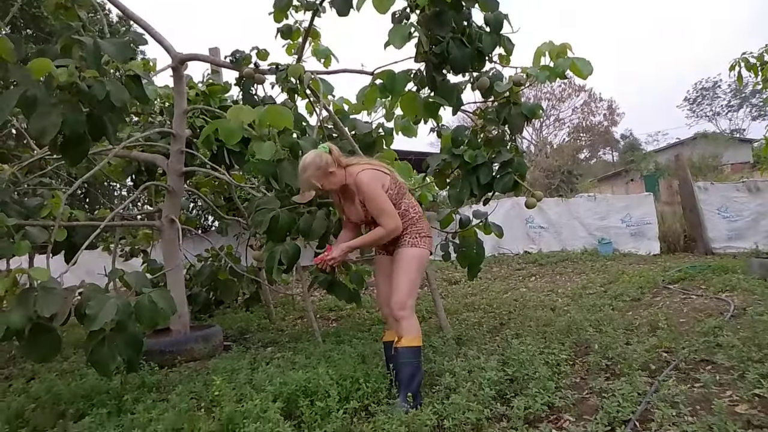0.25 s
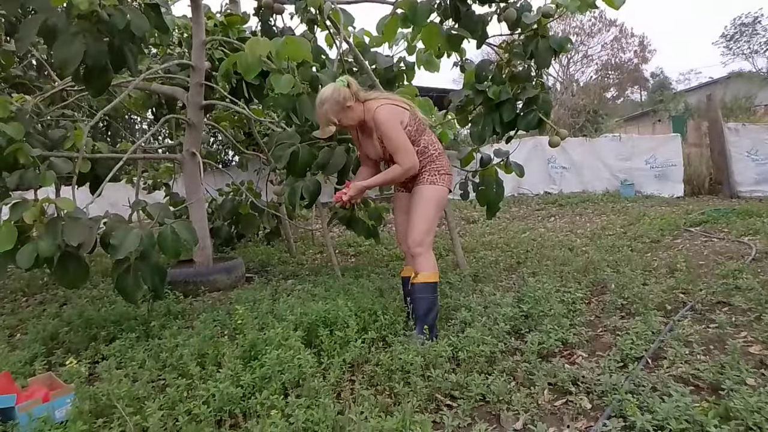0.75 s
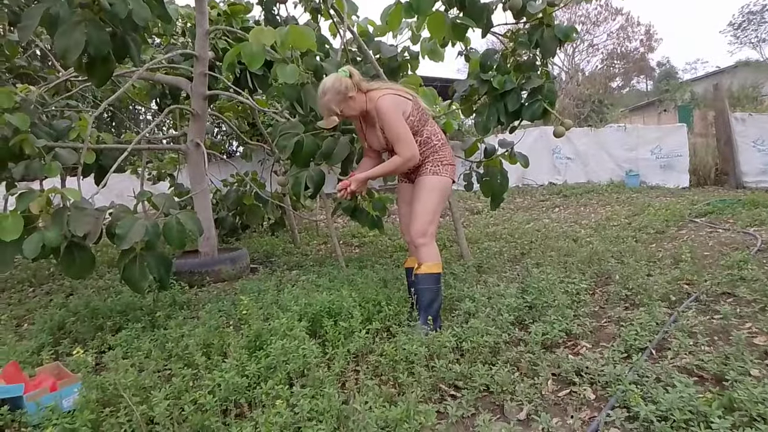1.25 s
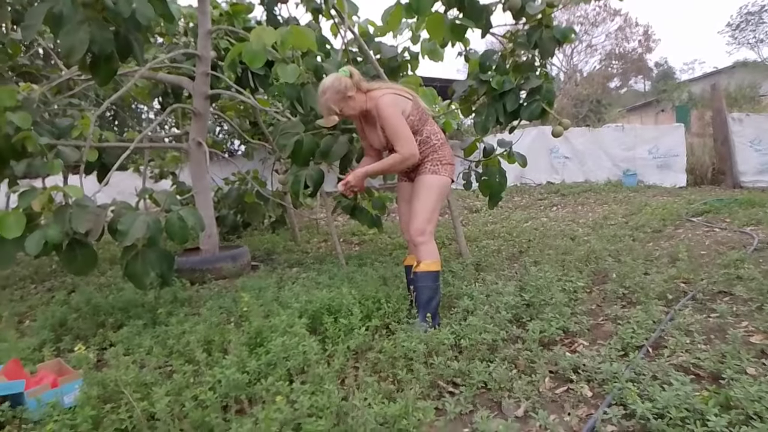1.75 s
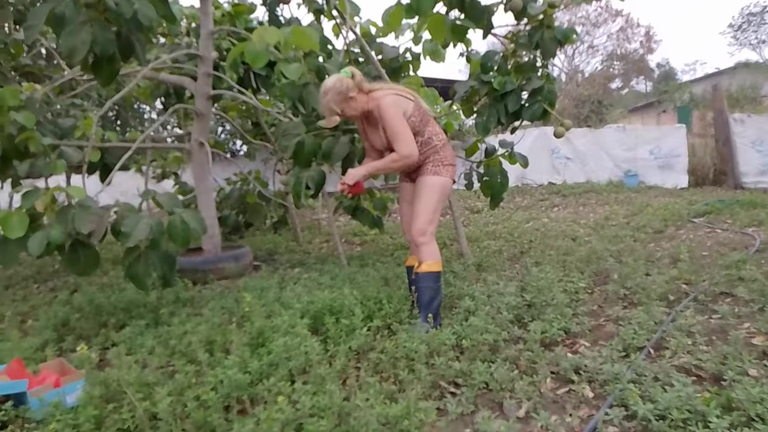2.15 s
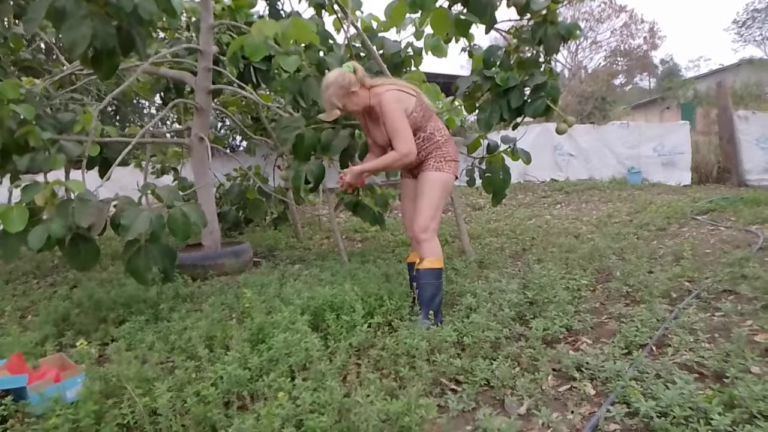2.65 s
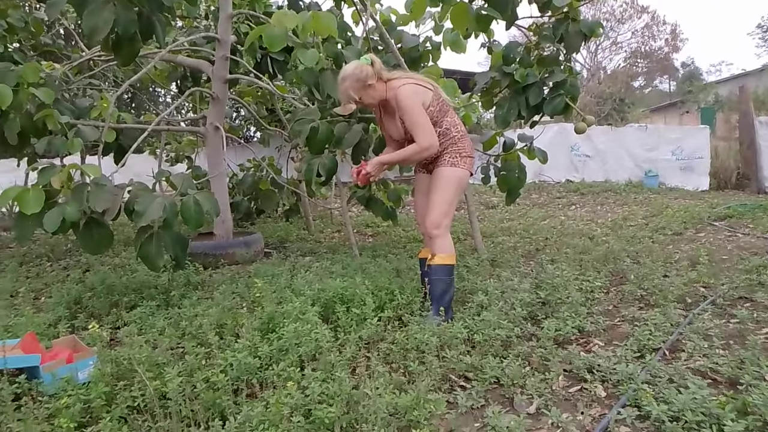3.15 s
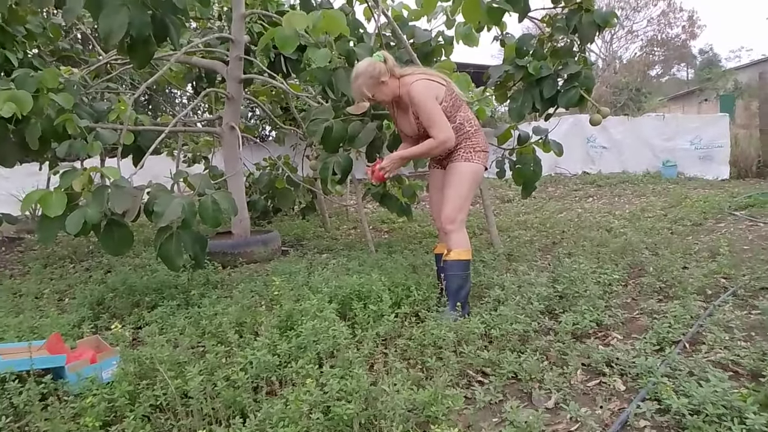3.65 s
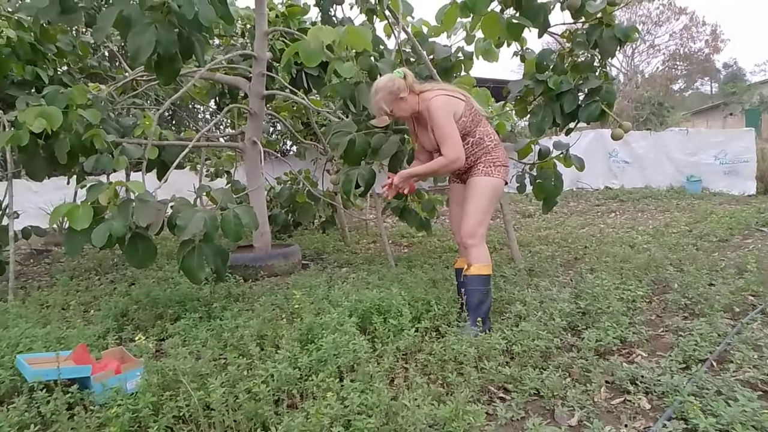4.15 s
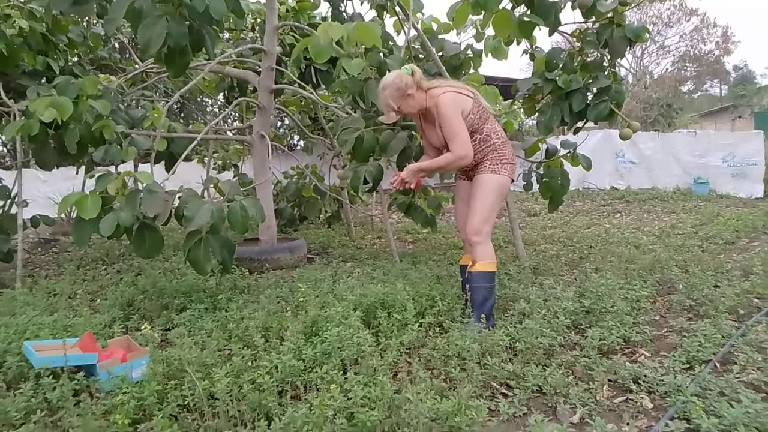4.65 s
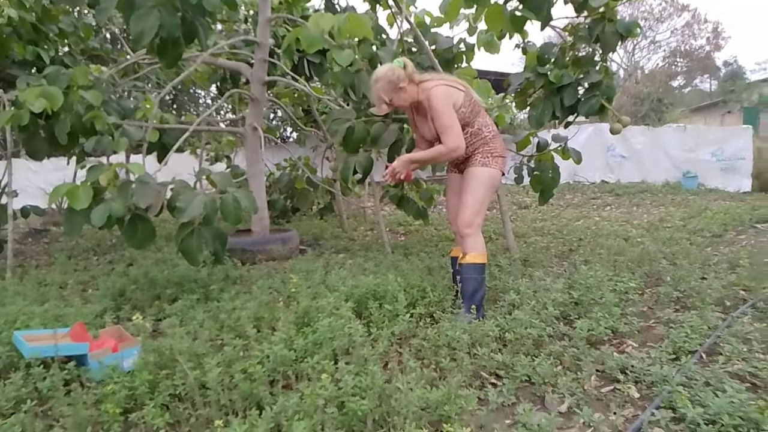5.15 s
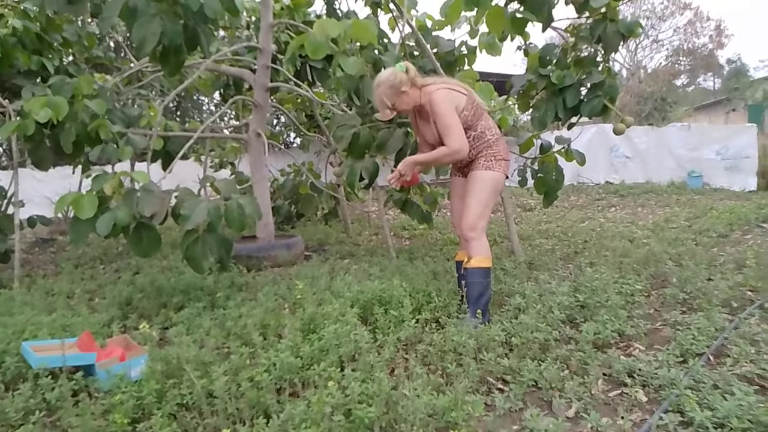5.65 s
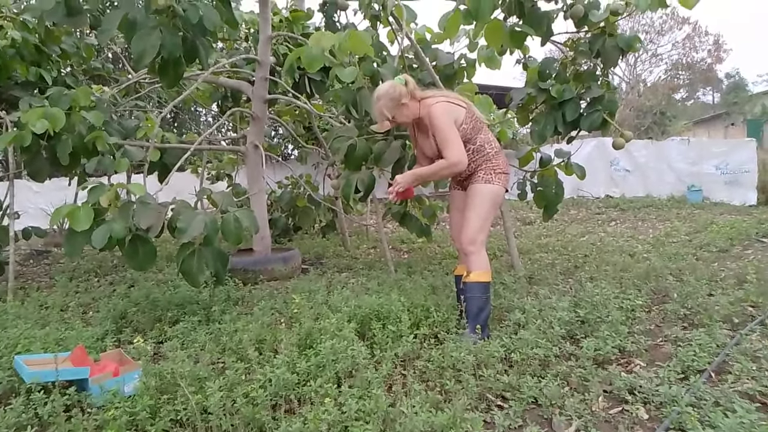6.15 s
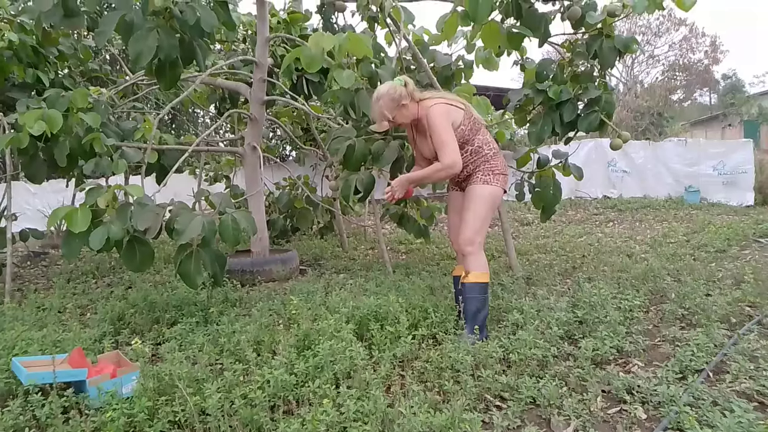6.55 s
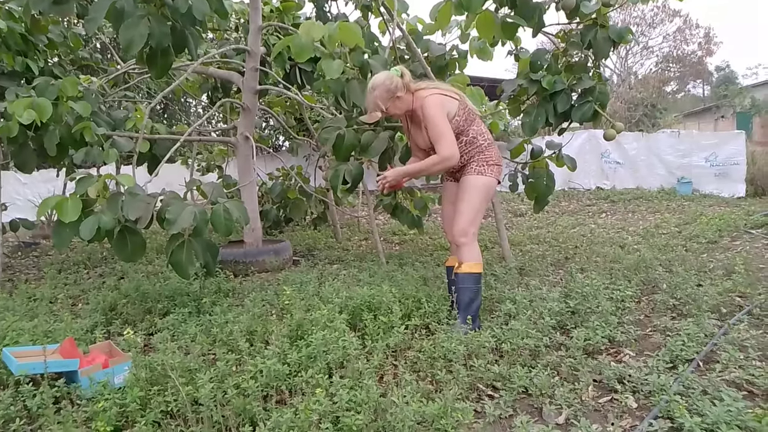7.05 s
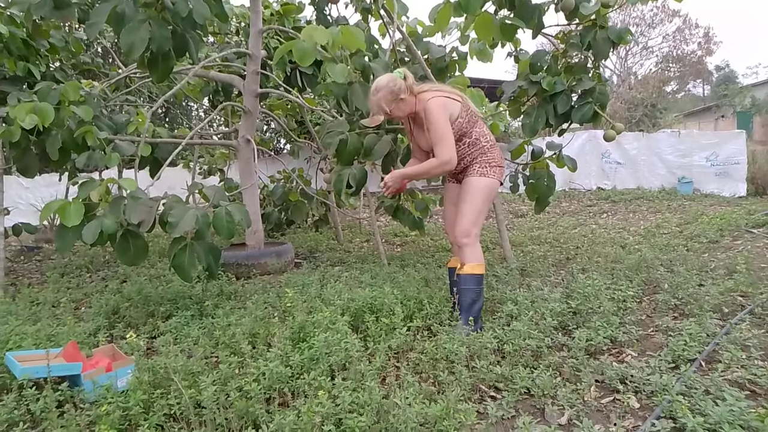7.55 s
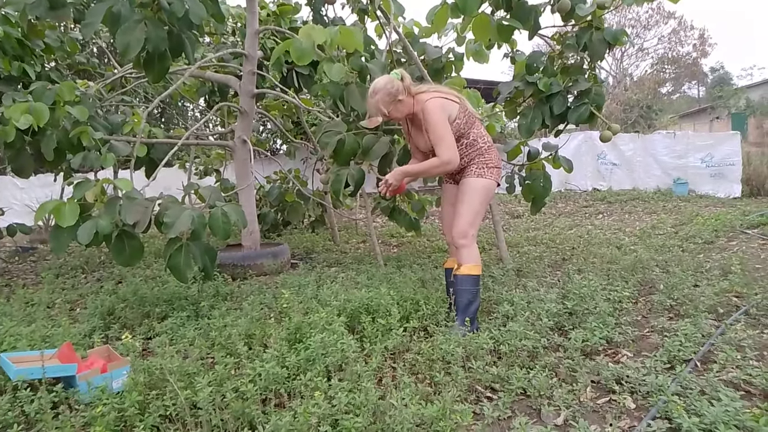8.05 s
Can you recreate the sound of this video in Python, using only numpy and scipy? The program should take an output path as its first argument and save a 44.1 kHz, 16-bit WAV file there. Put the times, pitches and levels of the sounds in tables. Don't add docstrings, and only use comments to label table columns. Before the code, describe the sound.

Four clear, piercing downward bird whistles, well spaced outdoors, with tiny far peeps and twitters between them and very faint pulsing air noise.

```python
import sys
import numpy as np
from scipy import signal
from scipy.fft import rfft, irfft, next_fast_len
from scipy.io import wavfile
from scipy.ndimage import uniform_filter1d

SR = 44100
rng = np.random.default_rng(int(sys.argv[2]) if len(sys.argv) > 2 else 0)


def makeup_ratio(level_db):
    decades = np.asarray(level_db, float) / 20
    return 10 ** decades


def digitize_waveform(pressure):
    field = np.atleast_2d(pressure).T
    bounded = np.clip(field, -1, 1)
    quanta = np.round(bounded * 32767).astype(np.int16)
    wavfile.write(sys.argv[1], SR, quanta)


N = 366030

# low_hz, high_hz
GARDEN_BANDS_HZ = [(40, 330), (400, 1900), (4900, 6100), (11500, 15000)]
# freq_hz, density_db_per_hz
AIR_SPECTRUM = [(15, -58), (25, -17), (116, -10), (188, -12), (433, -20.5), (482, -28.5), (1310, -22),
                (2240, -20.5), (2560, -0.5), (2850, -15.5), (3830, -24), (6220, -23), (15500, -70.5)]
# time_s, level_db
MOTOR_LEVEL = [(0, -15), (.7, 8.5), (1.2, 7), (1.8, 9), (2.5, 1), (3.2, -8), (4.5, -7.5), (6, -1.5),
               (7, -6.5), (8.3, -10)]
# freq_hz, level_db
MOTOR_LINES_HZ_DB = [(61.5, -1), (122, -5.5), (183, -20), (456, -24.5)]
# shut_db, lift_share, treble_share
BAND_GAINS = [
    (-73.5, 0.88, 0.16),
    (-83.5, 1.24, 0),
    (-93.5, 1.06, 0.96),
    (-100, 1.416, 0.53),
]
# start_s, open_s, closing_s, lift_db, treble_db
LEAPS_OPEN = [
    (1.058, 0.41, 0.55, 19.5, 0.5),
    (3.337, 0.43, 0.2, 16, 9),
    (6.078, 0.31, 0.24, 15, 7.5),
    (8, 0.12, 0.39, 20, -4),
]
# start_s, open_s, closing_s, lift_db, treble_db
CREEPS_OPEN = [(0, 0.02, 0.15, 7.5, -2), (.28, 0.036, 0.43, 8.5, -7), (.73, 0.62, 0.11, 4.5, 4),
               (1.205, 0.127, 0.16, 21, 9.5), (1.72, 0.13, 0.2, 8.5, -12), (1.98, .06, 0.26, 6, 0.5),
               (2.45, 0.36, .1, 3.5, 10), (2.64, 0.018, 0.34, 5.5, 16), (2.87, 0.028, 0.39, 6.5, 7),
               (3.2, 0.27, .05, 3, 12.5), (3.5, 0.074, 0.17, 19, 11.5), (3.9, .1, 0.15, 3, 1.5),
               (4.18, 0.11, 0.43, 6.5, -6), (4.9, 0.088, 0.081, -2.5, -3), (5.32, 0.044, 0.26, 6.5, -4.5),
               (5.8, 0.31, 0.11, 2, 6.5), (6.28, 0.073, 0.12, 17, 10), (6.5, 0.082, 0.18, 9, -3.5),
               (6.6, 0.15, 0.6, 8.5, 7), (7.15, 0.051, .1, -1, 10.5), (7.39, 0.12, 0.06, 2.5, 7.5),
               (7.55, 0.45, 0.33, 6.5, 2), (8.1, 0.048, 0.27, 16.5, 5)]
# start_s, peak_db
LEAF_PUFFS = [(2.1331, -72), (2.676, -54.5), (3.3415, -45), (3.3832, -53.5), (3.542, -55.5), (3.613, -51.5),
              (3.7579, -66.5), (3.8232, -50.5), (3.912, -71), (5.9035, -64), (6.4213, -61.5)]
# start_s, length_s, centre_hz, width_hz, level_db
TWITTER_PATCHES = [(0.31, 0.37, 8500, 2500, -79), (1.614, 0.19, 9900, 2430, -63.5),
                   (2.329, 0.53, 8180, 2515, -77), (2.875, 0.1, 8100, 2210, -68),
                   (3.284, 0.28, 8140, 1190, -65.5), (3.54, 0.15, 8400, 1260, -57),
                   (4.232, 0.27, 7780, 2170, -71), (4.929, 0.26, 8840, 1980, -77.5),
                   (6.601, 0.22, 7770, 1090, -67.5), (6.717, 0.22, 6230, 1210, -73),
                   (7.388, 0.061, 8200, 1400, -77.5), (7.505, 0.3, 6890, 1810, -70),
                   (8.279, 0.055, 7960, 1210, -66), (1.475, 0.28, 672, 519, -63.5),
                   (2.93, 0.16, 679, 670, -70.5), (3.658, 0.04, 1210, 1200, -58),
                   (0, 0.073, 2990, 1290, -62.5), (4.17, 0.12, 8000, 2600, -76.5)]
TWITTER_SLIDES_HZ = [1, 0, 0, 0, -0.5, 0, -1800, 900.5, 297, -600, -0.5, -300, -2, -0.5, 0, -0.5, 0, 1]
# start_s, length_s, start_hz, end_hz, level_db
HELD_PEEPS = [(0, 0.25, 4100, 3950, -78), (.27, 0.18, 4043, 3870, -67.5), (.855, 0.08, 4010, 3780, -66.5),
              (1.21, 0.19, 3910, 3680, -55.5), (1.585, .15, 4076, 3640, -62.5),
              (2.01, 0.16, 3867, 3810, -69), (2.02, 0.16, 3430, 3390, -74), (2.38, 0.18, 3870, 3320, -76.5),
              (2.92, 0.058, 4410, 4510, -72), (3.43, 0.14, 4060, 4090, -52), (3.46, 0.13, 3800, 3290, -54),
              (4.225, 0.12, 4107, 4020, -58), (4.92, 0.19, 3910, 3570, -80.5),
              (5.39, 0.065, 4005, 3700, -66.5), (5.5, 0.08, 4070, 3250, -74.5),
              (5.66, 0.098, 4010, 3900, -79.5), (5.895, 0.047, 3980, 3750, -71),
              (6.3, 0.1, 4060, 3880, -57), (7.945, 0.11, 4530, 4070, -62.5)]
# start_s, length_s, start_hz, end_hz, level_db
FALLING_STROKES = [(.72, 0.074, 5040, 4220, -72.5), (1.94, .04, 4600, 4750, -72),
                   (1.97, 0.05, 4650, 3870, -70.5), (3.08, 0.038, 3760, 4230, -72),
                   (4.2, 0.065, 4000, 3060, -69.5), (4.212, 0.024, 4620, 4100, -67),
                   (4.82, 0.038, 4690, 3700, -67.5), (5.16, .07, 5120, 4910, -80),
                   (5.27, 0.095, 3810, 2720, -73.5), (5.33, .075, 5000, 4000, -67.5),
                   (5.67, 0.06, 4450, 4330, -78), (5.77, 0.046, 2370, 2230, -70),
                   (5.865, 0.04, 4850, 3950, -74.5), (6.04, 0.045, 4350, 4750, -65.5),
                   (6.245, 0.05, 3440, 1990, -55), (7.42, 0.06, 4310, 3000, -68),
                   (7.47, .04, 2960, 2930, -75), (7.58, 0.1, 4850, 2940, -66.5),
                   (7.64, 0.079, 3790, 3010, -65),
                   (0.439, 0.051, 3830, 2880, -74), (1.64, .12, 3600, 3250, -74),
                   (1.799, .07, 3430, 3060, -78), (1.89, .04, 3610, 3100, -74),
                   (4.334, 0.074, 4120, 2980, -63.5), (4.826, 0.039, 3600, 2980, -69.5),
                   (4.857, 0.062, 3780, 3550, -72), (5.3, .05, 5500, 4980, -80),
                   (5.35, .04, 3000, 2850, -75), (5.421, 0.046, 3980, 2770, -68),
                   (5.944, 0.045, 3820, 2760, -63.5), (6.935, .065, 4290, 1870, -62.5),
                   (7.502, .2, 3920, 3760, -75), (7.604, .07, 3300, 2730, -74.5),
                   (7.67, 0.067, 3510, 3030, -74), (7.7, .06, 2890, 1690, -72),
                   (8.028, 0.1, 4390, 4180, -56)]
# start_s, length_s, start_hz, end_hz, level_db
STRAY_NOTES = [ (4.314, 0.04, 5900, 4300, -79), (4.355, 0.085, 7080, 6820, -69),
               (5.551, 0.038, 7630, 9900, -72), (6.365, 0.05, 1112, 1070, -68),
               (7.088, 0.05, 9530, 8270, -82), (8.113, .03, 8800, 7640, -69)]
# start_s, length_s, start_hz, end_hz, level_db
HIDDEN_CALLS = [(3.985, .09, 3950, 3200, -69), (3.985, .05, 3325, 3150, -70), (4.03, .06, 3700, 3300, -72),
                (4.08, .09, 3700, 3400, -76), (4.4, .03, 3500, 3000, -69), (6.14, .085, 4750, 4100, -60),
                (6.14, .05, 5200, 4700, -64), (6.21, .07, 4100, 3700, -60), (6.665, .125, 4900, 3250, -67),
                (6.7, .09, 4750, 4400, -74), (6.735, .05, 3750, 3250, -70), (6.78, .08, 4100, 3500, -72),
                (6.6, .04, 5100, 4950, -81), (6.82, .13, 5800, 4100, -75), (6.86, .1, 3850, 4000, -72),
                (6.96, .07, 3900, 3400, -70), (5.75, .07, 3900, 3550, -73), (5.78, .02, 3100, 3600, -76),
                (5.81, .05, 4250, 4150, -76), (5.94, .05, 4000, 3500, -74), (5.965, .03, 4100, 4450, -72),
                (6.02, .04, 3200, 2300, -75), (7.38, .08, 4900, 4800, -77), (2.45, .055, 5300, 4880, -81),
                (.87, .1, 7900, 6600, -82), (.8, .07, 8100, 7900, -85), (1.015, .05, 9500, 8400, -80),
                (1.06, .06, 8400, 7800, -68), (3.42, .03, 5100, 4500, -65), (3.51, .04, 7400, 7500, -63),
                (.262, .05, 3930, 2660, -77), (2.6, .15, 3800, 3300, -74), (4.68, .09, 3200, 2250, -82),
                (2.65, .05, 5600, 6300, -73), (1.7, .04, 3700, 3000, -70), (6.65, .1, 7400, 8100, -72)]
# start_s, length_s, start_hz, end_hz,
# level_db
SHORT_CHIPS = [(.918, .045, 3330, 2750, -65), (.9, .06, 10700, 9900, -80), (1.627, .01, 8700, 10800, -52),
               (1.628, .016, 10500, 10400, -58), (6.295, .04, 9900, 8500, -66),
               (1.33, .016, 3500, 3300, -48), (6.36, .016, 3500, 3300, -48), (8.145, .016, 4700, 4000, -54),
               (1.258, .045, 9700, 8300, -63), (2.882, .035, 7480, 9840, -69)]
# time_s, pitch_hz, level_db
NEAR_WHISTLES = [
    [(.972, 4580, -60), (1.038, 4460, -37.5), (1.062, 4150, -39.5), (1.096, 3820, -32), (1.122, 3380, -33),
     (1.252, 3197, -32.5), (1.298, 2797, -30.5), (1.332, 2294, -33), (1.35, 2225, -53)],
    [(3.163, 4400, -51.5), (3.21, 3850, -43.5), (3.336, 3620, -40.5), (3.375, 3430, -38),
     (3.385, 3446, -33.5), (3.47, 3355, -33), (3.5, 3242, -32), (3.532, 2840, -33.5), (3.562, 2186, -37)],
    [(5.99, 4350, -58), (6.044, 3980, -44), (6.084, 3684, -36.5), (6.115, 3587, -37), (6.124, 3510, -33),
     (6.162, 3710, -30.5), (6.224, 3428, -30.5), (6.308, 3237, -29.5), (6.328, 2950, -31),
     (6.352, 2375, -32.5), (6.368, 2227, -40)],
    [(7.785, 4320, -51), (7.944, 3790, -40), (8.003, 3960, -37), (8.009, 3940, -45), (8.016, 3510, -32),
     (8.05, 3403, -29), (8.116, 3113, -32.5), (8.132, 2670, -31), (8.158, 2194, -36.5)],
]
# pitch_hz, octave_db
OCTAVE_LEVEL = [(2200, -9.5), (2750, -28), (3200, -21.5), (3420, -28.5), (3600, -41), (4400, -51)]
EARLY_WAVER_RATIO = [.006, .003, .016, .001]

SHUT_DB = -12.5
LEAP_S, CREEP_S, SAG_DB_PER_S = .004, .055, 3.5
HOOK_S, HOOK_PITCH_RATIO, HOOK_DB = .016, .8, -9
HELD_BEND, STROKE_BEND = 3.0, 1.05
HELD_EDGE_DB, STROKE_EDGE_DB, PEAK_SKEW = -9, -3, .85
SCATTER_S, SCATTER_DB, DIRECT_DB = .07, 0, -7
CHIRP_S, CHIRP_FALL_RATIO, CHIRP_DB = .03, .08, -5


def walk(rate_hz):
    k = int(SR / rate_hz)
    held = np.repeat(rng.standard_normal(N // k + 1), k)
    return 1.262 * uniform_filter1d(uniform_filter1d(held, k), k)[:N]


def noise(centre_hz, width_hz):
    size = next_fast_len(N)
    freq_hz = np.arange(size // 2 + 1) * SR / size
    bell = np.exp(-2 * ((freq_hz - centre_hz) / width_hz) ** 2)
    x = irfft(rfft(rng.standard_normal(size)) * bell, size)[:N]
    return x / x.std()


def echo(x, t60_s, wet_db, first_s=0.0029):
    t = np.arange(int(t60_s * SR)) / SR
    tail = rng.standard_normal(len(t)) * makeup_ratio(-60 * t / t60_s) * np.clip(t / first_s, 0, 1)
    return makeup_ratio(wet_db) * signal.fftconvolve(x, tail / np.sqrt(np.sum(tail ** 2)))[:N]


def glides(rows, bend, edge_db):
    u = np.arange(9) / 8
    arch = (2 * u ** PEAK_SKEW - 1) ** 2
    return [np.transpose([s + length * u, a + (b - a) * u ** bend, db + edge_db * arch])
            for s, length, a, b, db in rows]


def sing(notes, waver, third_db=-99, edge_s=0.0021, slew_s=.008):
    out, shake = np.zeros(N), 1 + waver * walk(120)
    for note in notes:
        s, hz, *levels = np.transpose(note)
        i = np.arange(int(s[0] * SR), min(int(s[-1] * SR), N))
        pitch_hz = uniform_filter1d(np.interp(i / SR, s, hz), int(slew_s * SR), mode="nearest")
        phase = 2 * np.pi * np.cumsum(pitch_hz * shake[i]) / SR
        fade = np.clip(np.minimum(i - i[0], i[-1] - i) / (edge_s * SR), 0, 1)
        if len(levels) > 1:
            levels.append(levels[1] + third_db)
        for k, db in enumerate(levels):
            out[i] += np.sqrt(2) * fade * makeup_ratio(np.interp(i / SR, s, db)) * np.sin((k + 1) * phase)
    return out


def let_through():
    t, lifts_db = np.arange(N) / SR, np.zeros((len(BAND_GAINS), N))
    for rows, rise_s in (LEAPS_OPEN, LEAP_S), (CREEPS_OPEN, CREEP_S):
        for s, hold_s, closing_s, db, treble_db in rows:
            shape = np.clip(np.minimum((t - s) / rise_s, (s + hold_s + closing_s - t) / closing_s), 0, 1)
            sagging_db = db - SAG_DB_PER_S * np.clip(t - s, 0, hold_s)
            opening_db = [shape * (a * sagging_db + b * treble_db) for _, a, b in BAND_GAINS]
            lifts_db = np.maximum(lifts_db, opening_db)
    return lifts_db + np.array(BAND_GAINS)[:, :1]


def motor(bass_db):
    hum = np.zeros(N)
    for hz, db in MOTOR_LINES_HZ_DB:
        level = makeup_ratio(db + 2.0 * walk(5.2))
        hum += level * np.sin(2 * np.pi * hz * np.cumsum(1 + 0.0038 * walk(1.5)) / SR)
    return hum * makeup_ratio(bass_db + np.interp(np.arange(N) / SR, *np.transpose(MOTOR_LEVEL)))


def garden():
    bands_db = let_through()
    fine_hz = np.arange(20, 16000, 10.)
    air_hz, air_level_db = np.transpose(AIR_SPECTRUM)
    air_db = np.interp(np.log(fine_hz), np.log(air_hz), air_level_db)
    lift_db = []
    for band_db, (a, b) in zip(bands_db, GARDEN_BANDS_HZ):
        power = 10 * np.sum(makeup_ratio(2 * air_db[(fine_hz > a) & (fine_hz < b)]))
        lift_db.append(band_db - 10 * np.log10(power))
    centres = np.log([np.sqrt(a * b) for a, b in GARDEN_BANDS_HZ])
    index = np.arange(len(centres))
    out = np.zeros(N)
    for hz in 28 * 2 ** (np.arange(28) / 3):
        shares = np.clip(1 - abs(np.interp(np.log(hz), centres, index) - index), 0, 1)
        db = np.interp(hz, fine_hz, air_db) + 10 * np.log10(0.24 * hz)
        db = db + sum(share * lift for share, lift in zip(shares, lift_db))
        out += makeup_ratio(db + 1.9 * walk(5) + 1.0 * walk(25)) * noise(hz, 0.33 * hz)
    return out + motor(bands_db[0])


def rustles():
    puffs, t = np.zeros(N), np.arange(N) / SR
    for s, db in LEAF_PUFFS:
        late_s = np.clip(t - s, 0, None)
        puffs += makeup_ratio(db - 15) * (1 - np.exp(-late_s / 0.0022)) * np.exp(-(late_s / 0.039) ** 2)
    return puffs * makeup_ratio(5.0 * walk(350)) * noise(11500, 9000)


def twitter():
    out, t = np.zeros(N), np.arange(N) / SR
    for (s, length, hz, width, db), slide_hz in zip(TWITTER_PATCHES, TWITTER_SLIDES_HZ):
        u = np.clip((t - s) / length, 0, 1)
        centre_hz = hz + slide_hz * (u - .5)
        patch = np.sqrt(2) * noise(0, width) * np.cos(2 * np.pi * np.cumsum(centre_hz) / SR)
        chirps = []
        for a, b in rng.random((10, 2)):
            start_s = s + a * length
            chirp_hz = hz + slide_hz * (a - .5) + width * (b - .4)
            if hz > 5000 and start_s < N / SR - .01:
                chirps.append((start_s, CHIRP_S, chirp_hz, chirp_hz * (1 - CHIRP_FALL_RATIO), CHIRP_DB))
        patch += sing(glides(chirps, 1, -12), waver=.01)
        swell = np.sin(np.pi * u ** (.45 if db > -65 else .75))
        out += makeup_ratio(db + 1.8 * walk(70)) * swell * patch
    return out


def flock():
    flutter_db = walk(70)

    def stroke_voice(rows):
        notes = glides(rows, STROKE_BEND, STROKE_EDGE_DB)
        return sing(notes, waver=.016, edge_s=.008) * makeup_ratio(4.4 * flutter_db - 1.5)

    held = sing(glides(HELD_PEEPS, HELD_BEND, HELD_EDGE_DB), waver=.007, edge_s=.01)
    held = held * makeup_ratio(2.5 * flutter_db)
    strokes = stroke_voice(FALLING_STROKES + STRAY_NOTES)
    hidden = stroke_voice(HIDDEN_CALLS)
    smear = echo(hidden + .4 * strokes, SCATTER_S, SCATTER_DB, first_s=.002)
    chip_notes = [[(s, a, db), (s + length, b, db)] for s, length, a, b, db in SHORT_CHIPS]
    chips = sing(chip_notes, waver=.01, slew_s=.002)
    return held + .75 * strokes + makeup_ratio(DIRECT_DB) * hidden + smear + chips


def near_bird():
    t = np.arange(N) / SR
    notes, early = [], []
    for whistle, leap in zip(NEAR_WHISTLES, LEAPS_OPEN):
        s, hz, db = whistle[0]
        hook = (s - HOOK_S, hz * HOOK_PITCH_RATIO, db + HOOK_DB)
        points = [hook] + list(whistle)
        notes.append([(s, hz, db, db + np.interp(hz, *np.transpose(OCTAVE_LEVEL))) for s, hz, db in points])
        early.append((t > hook[0]) * np.clip((leap[0] - t) / LEAP_S + 1, 0, 1))
    waver = .004 + sum(w * e for w, e in zip(EARLY_WAVER_RATIO, early))
    return sing(notes, waver=waver, third_db=-26, slew_s=.006) * makeup_ratio(.8 * walk(45) + SHUT_DB * sum(early))


def suppress(x, loud, streak_db, hold_s, knee_db, open_db):
    hop = 256
    frames = dict(nperseg=1024, noverlap=1024 - hop)
    z = signal.stft(x, **frames)[2]
    power = abs(signal.stft(loud, **frames)[2]) ** 2
    field = uniform_filter1d(rng.standard_normal(z.shape), int(hold_s * SR / hop), axis=1)
    field = uniform_filter1d(field, size=2, axis=0)
    keep, linger = np.exp(-hop / (.048 * SR)), np.exp(-hop / (.012 * SR))
    heard = uniform_filter1d(signal.lfilter([1 - keep], [1, -keep], power, axis=1), size=13, axis=0)
    heard = np.roll(heard, 7, axis=0)
    sounding = signal.lfilter([1 - linger], [1, -linger], power.sum(axis=0))
    sink = 1 + heard / (makeup_ratio(2 * knee_db) + makeup_ratio(2 * open_db) * sounding)
    gain = makeup_ratio(streak_db * field / field.std()) / np.sqrt(sink)
    return signal.istft(z * gain, **frames)[1][:N]


def scene():
    bird, peeps = near_bird(), flock()
    returns = echo(bird, t60_s=.33, wet_db=-12, first_s=.015) + echo(peeps, t60_s=.26, wet_db=-4)
    faint = returns + twitter() + rustles() + garden()
    faint = suppress(faint, bird, streak_db=3.6, hold_s=.12, knee_db=-72, open_db=-4)
    return (bird + peeps + faint)[None]


def band_limit(x):
    return signal.sosfilt(signal.butter(12, 15670, fs=SR, output="sos"), x)


def record(dry):
    return band_limit(dry - .0006)


dry = scene()
out = record(dry)
digitize_waveform(out)
```